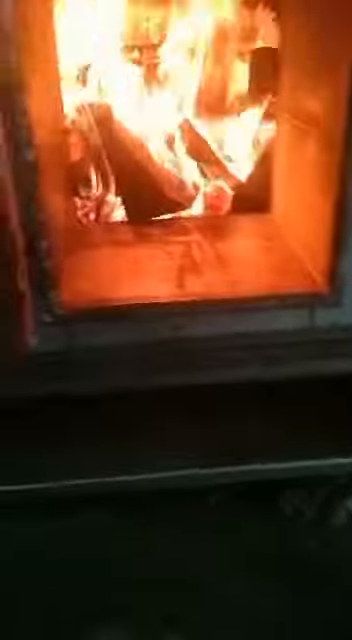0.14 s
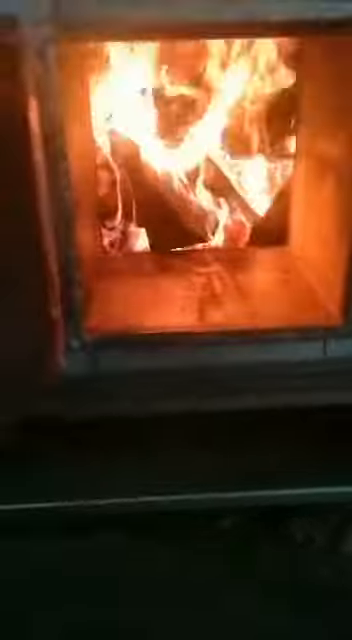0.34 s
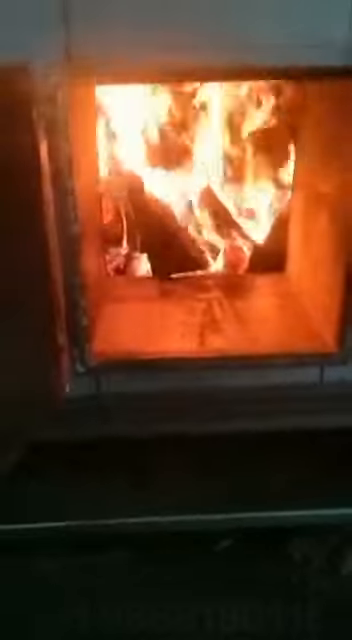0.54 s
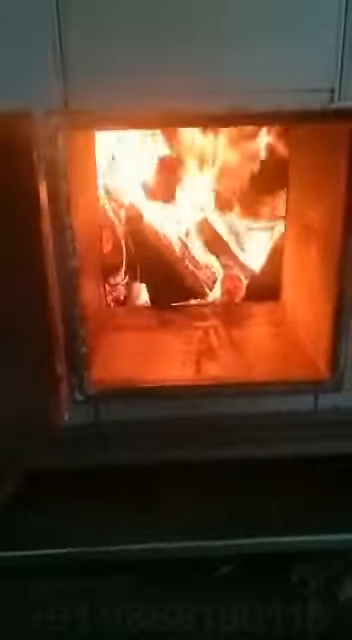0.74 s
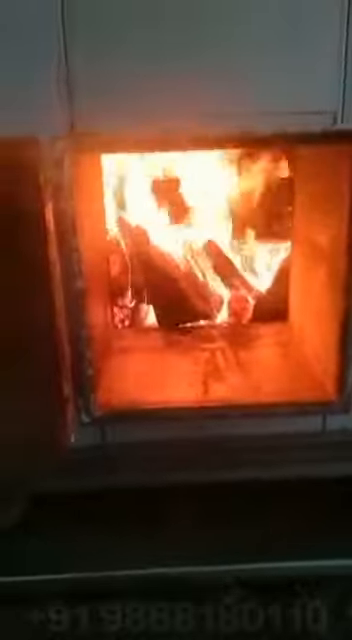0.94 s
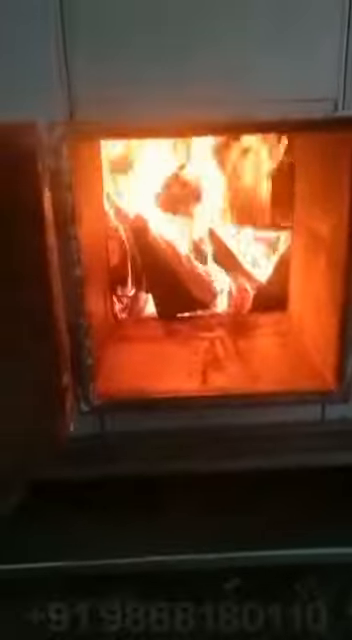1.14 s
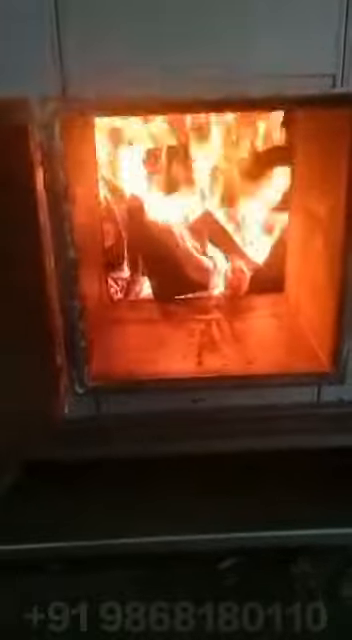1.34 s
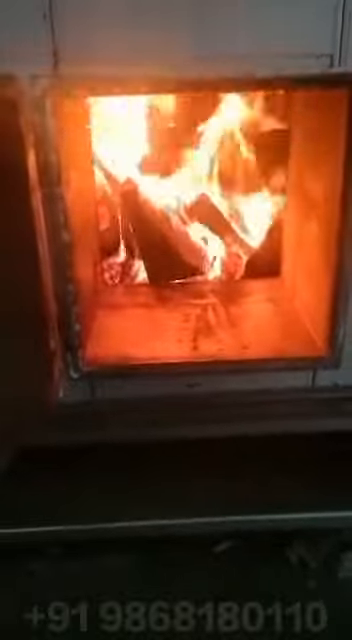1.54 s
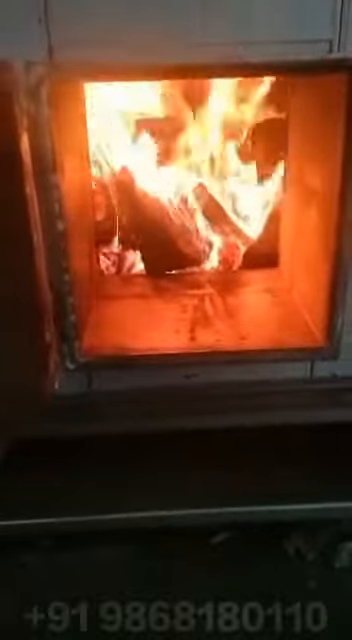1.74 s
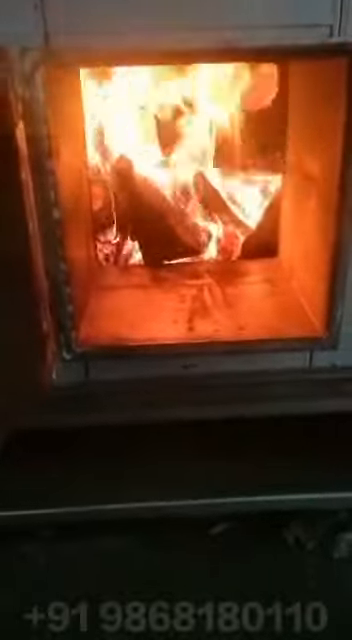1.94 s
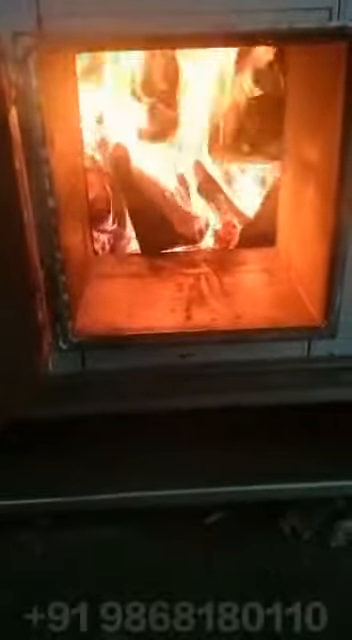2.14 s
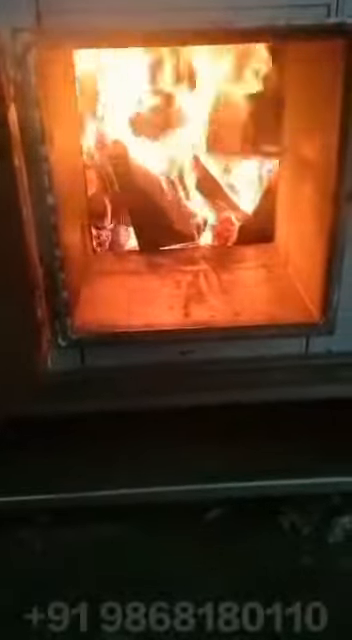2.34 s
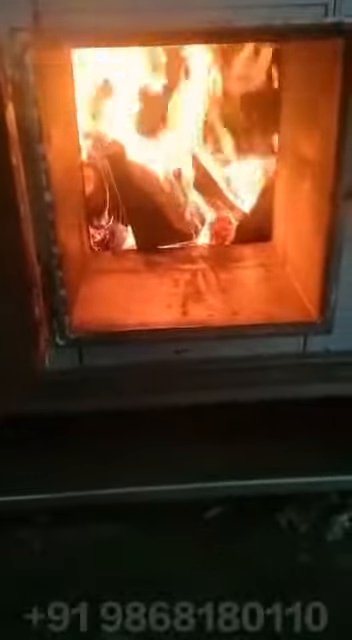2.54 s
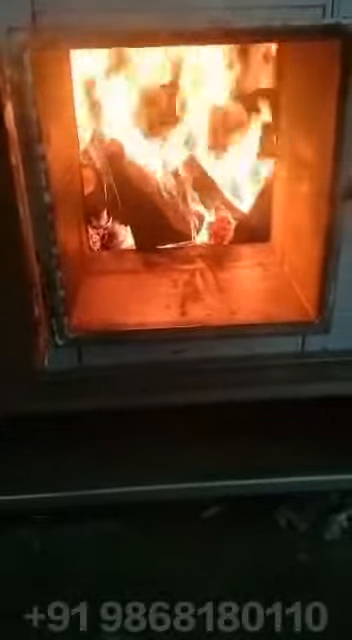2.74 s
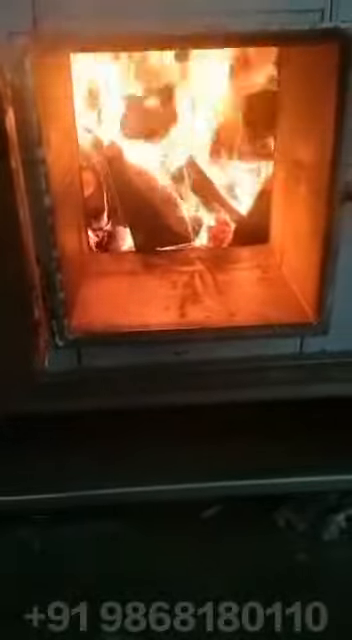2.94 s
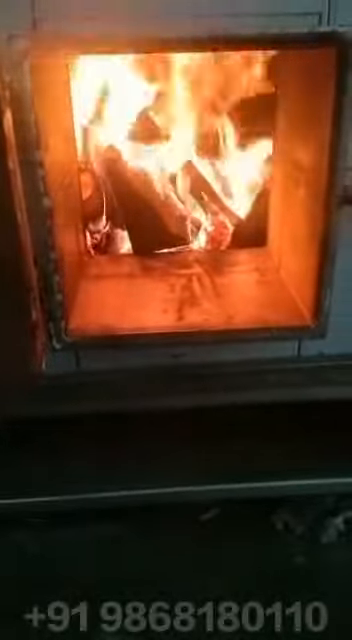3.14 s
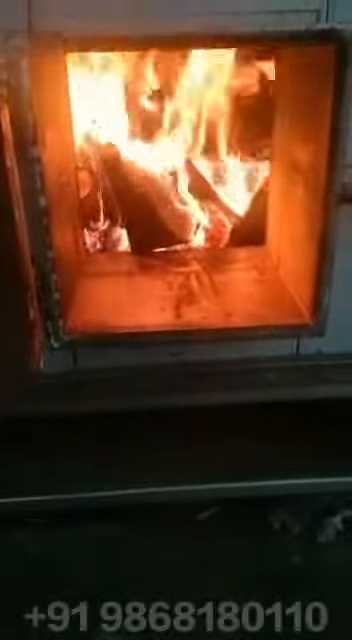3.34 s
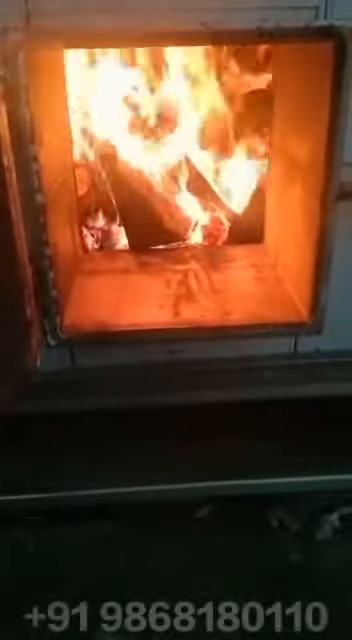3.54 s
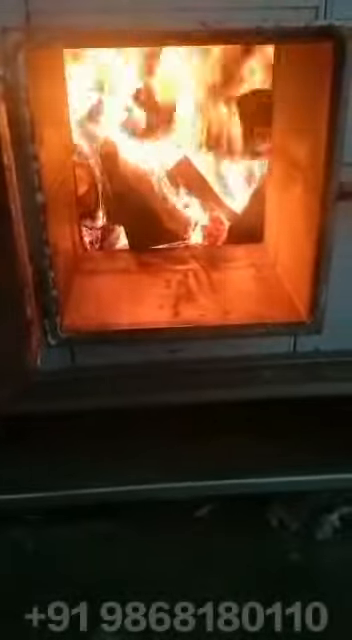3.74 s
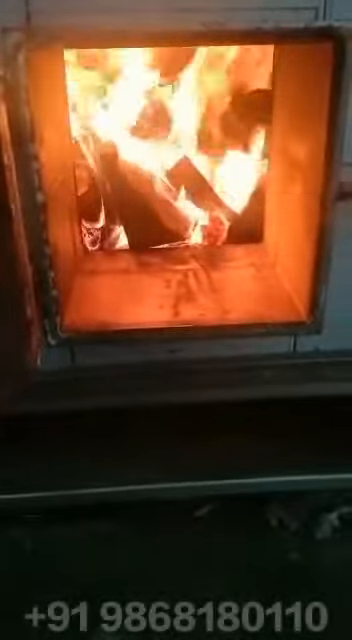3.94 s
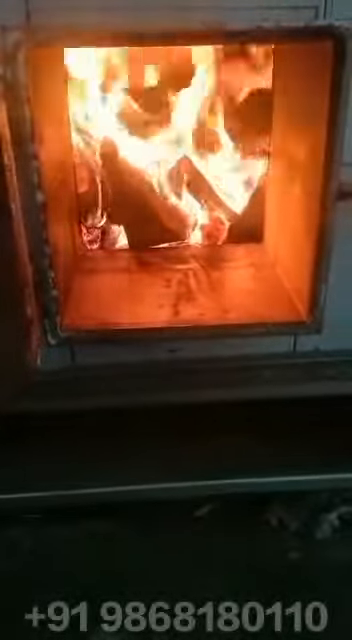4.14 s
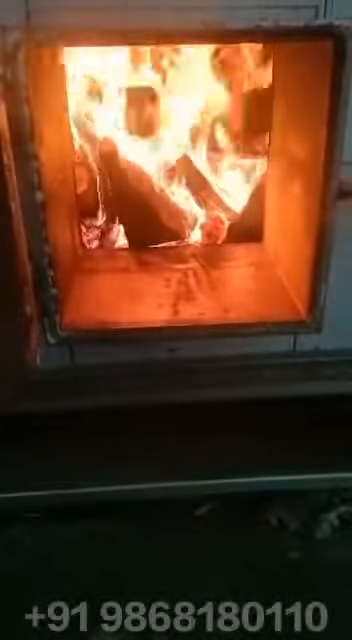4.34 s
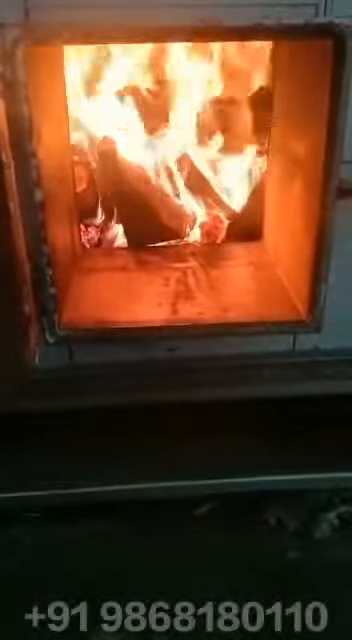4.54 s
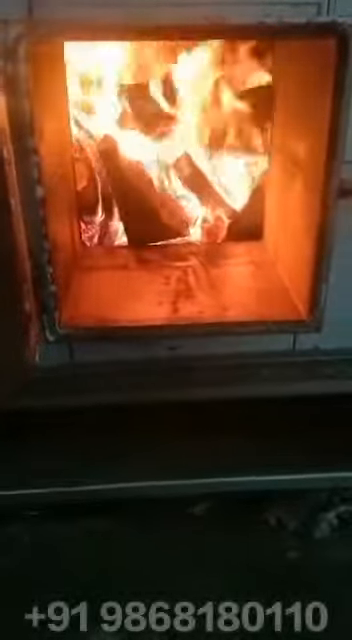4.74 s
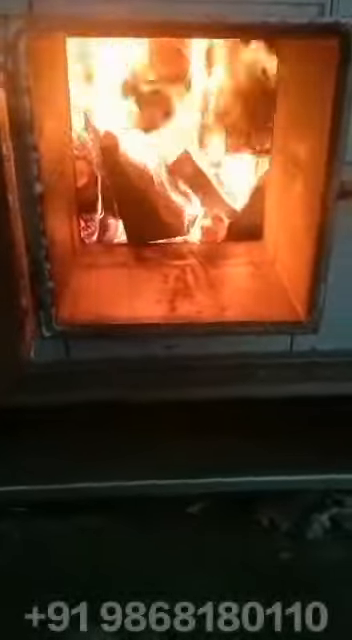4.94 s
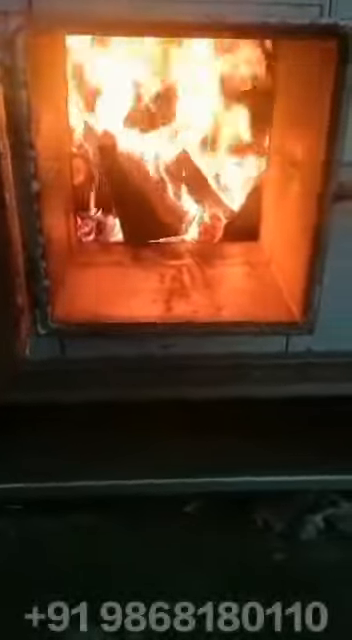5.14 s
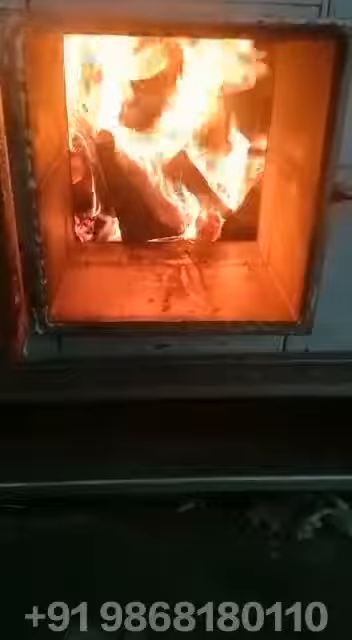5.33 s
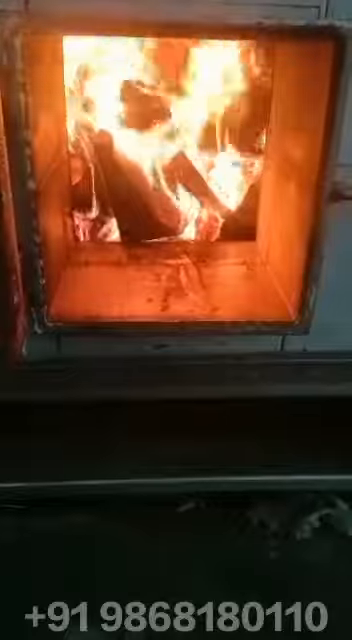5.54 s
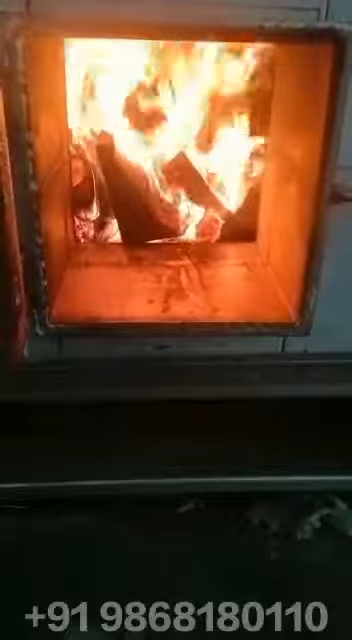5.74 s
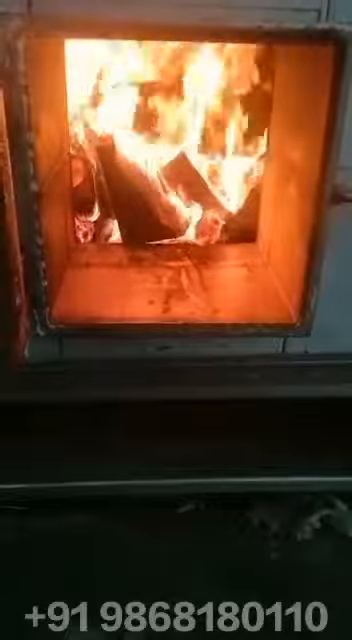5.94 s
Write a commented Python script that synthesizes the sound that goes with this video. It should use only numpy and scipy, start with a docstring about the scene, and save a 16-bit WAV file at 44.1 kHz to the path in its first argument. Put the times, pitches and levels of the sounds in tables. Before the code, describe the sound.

After a brief silence, a close log fire roars steadily in a furnace firebox with bright rushing hiss, flares and late fluttering puffs.

```python
"""After a short silence the steady roar and bright hiss of a hard-burning log fire cut in, close by.
Burning gas in the furnace firebox and its tongues of flame are banded noise that swells in flares and
lulls; pockets of gas puff in short noise bursts over a deep rumble. Draught through the grate is shaded
noise, and narrow resonances and brief notes sing in it. Hard walls colour the noise with drifting peaks,
different at each microphone."""
import sys
import numpy as np
from scipy import signal
from scipy.fft import rfft, irfft, next_fast_len
from scipy.io import wavfile
from scipy.ndimage import uniform_filter1d, map_coordinates

SR = 44100
rng = np.random.default_rng(int(sys.argv[2]) if len(sys.argv) > 2 else 0)


def digitize_waveform(pressure):
    """Quantize a signal to 16-bit integers and store it at the path in sys.argv[1].

    Rows of a 2-D input are taken as channels; values are limited to [-1, 1].
    """
    field = np.atleast_2d(pressure).T
    bounded = np.clip(field, -1, 1)
    quanta = np.round(bounded * 32767).astype(np.int16)
    wavfile.write(sys.argv[1], SR, quanta)


N = 263277
TIME = np.arange(N) / SR  # s

# left-right correlation of the fire's noise: f/Hz, correlation [-1 to 1]
FIRE_CORRELATION = [(60, 1), (250, 0.94), (450, 0.69), (800, 0.22), (1050, -0.1), (1600, -0.077),
                    (3000, 0.21)]
# treble shading of the hiss: t/s, level/dB contributed at 6 kHz
HISS_TREBLE = [(.27, -0.5), (.6, 1.5), (1.24, .5), (1.4, -2), (1.52, -5), (1.66, -8.5), (1.79, -14.5),
               (1.88, -2), (1.97, -2.5), (2.07, 2.5), (2.7, 1), (3.05, -2), (3.25, 1), (3.55, -2), (3.8, 2),
               (4.22, -2), (4.45, 1), (5.15, -1.5), (5.27, 1), (5.38, -7), (5.47, -2), (5.56, 0.5),
               (5.85, -1.5), (5.96, 1.5)]


def flames():
    """Combustion noise: burning gas roars low, and tongues of flame flutter above as they tear off."""
    # spectral density of the low roar: f/Hz, relative level/dB per Hz
    roar_spectrum = [(20, -51), (40, -28), (60, -23), (100, -10), (150, -7.5), (210, -0.5), (260, -2),
                     (310, 3), (370, 1), (450, -2), (700, -15), (1500, -31), (4000, -63.5)]
    # spectral density of the tongues of flame: f/Hz, relative level/dB per Hz
    tongue_spectrum = [(150, -32), (350, -6.5), (480, -3.5), (600, 0), (700, 1.5), (1000, 2.5), (1250, 1.5),
                       (1450, 1), (1700, -3.5), (2000, -7), (3500, -13), (7000, -53.5)]
    roar_base_db, tongue_base_db = -29.5, -20
    growth_db_per_s = 0.07
    tongue_share = 0.55  # of a flare's dB

    flare = flare_db()
    flicker_db = 0.67 * wobble(3.94) + 0.5 * wobble(12) + 0.5 * wobble(35)
    blaze_db = growth_db_per_s * TIME + flicker_db
    roar_db = roar_base_db + blaze_db + flare
    tongue_db = tongue_base_db + blaze_db + tongue_share * flare
    roar = turbulence(roar_spectrum, FIRE_CORRELATION, eddy_db=0.5, wall_db=3.0)
    tongues = turbulence(tongue_spectrum, FIRE_CORRELATION, eddy_db=0.15, wall_db=2.0)
    return amp(roar_db) * pan(0.67) * roar + amp(tongue_db) * pan(0.7) * tongues


def flare_db():
    """Heat-release variation: each flare or lull moves linearly in dB to its peak and back."""
    # flares and lulls: peak t/s, rise time/s, fall time/s, level/dB relative to the steady blaze
    flares = [(1.65, 0.42, 0.28, 3.6), (1.95, 0.24, 0.18, 4), (2.33, 0.12, 0.12, -1.5),
              (2.919, 0.25, 0.45, 2), (4.181, 0.074, 0.13, 2), (4.75, 0.4, .6, -1.5), (5.25, .03, 0.3, 0.5)]
    total_db = np.zeros(N)
    for peak_s, rise_s, fall_s, level_db in flares:
        rising = 1 + (TIME - peak_s) / rise_s
        falling = 1 - (TIME - peak_s) / fall_s
        total_db += level_db * np.clip(np.minimum(rising, falling), 0, 1)
    return total_db


def puffs():
    """Transient combustion: each gas pocket ignites with a dull thump and a brighter flap of flame."""
    # gas pockets: t/s, thump level/dB and flap level/dB before the burst envelope, decay constant/s
    pockets = [(1.735, -20, -32.5, .06), (1.885, -18.5, -21.5, 0.057), (2.04, -16, -27, .02),
               (5.216, -17, -15, 0.02), (5.237, -13, -7.5, .013), (5.263, -14, -6.5, .013),
               (5.283, -22, -9.5, 0.014), (5.34, -25, -18, 0.025), (5.378, -18, -17, 0.02),
               (5.422, -26, -9.5, .026), (5.47, -15.5, -14.5, .026), (5.54, -20, -15, 0.016)]
    # spectral density of the thump: f/Hz, relative level/dB per Hz
    thump_spectrum = [(25, -21.5), (70, -18), (120, -6.5), (260, 3), (450, -8), (900, -24)]
    # spectral density of the flap: f/Hz, relative level/dB per Hz
    flap_spectrum = [(250, -20.5), (480, -2.5), (750, -2.5), (1250, -0.5), (1800, -20.5), (4000, -26)]
    attack_s = 0.005

    thump_gain, flap_gain = np.zeros((2, N))
    for start_s, thump_db, flap_db, decay_s in pockets:
        age = np.maximum(TIME - start_s, 0)
        burst = (1 - np.exp(-age / attack_s)) * np.exp(-age / decay_s)
        thump_gain += amp(thump_db) * burst
        flap_gain += amp(flap_db) * burst
    thump = turbulence(thump_spectrum, FIRE_CORRELATION, eddy_db=0.5, wall_db=0.0)
    flap = turbulence(flap_spectrum, FIRE_CORRELATION, eddy_db=1.0, wall_db=5.0)
    return thump_gain * thump + flap_gain * flap


def draught():
    """Turbulent flow noise: air rushes through the grate in a hiss whose colour changes."""
    # spectral density of the rush, before shading: f/Hz, relative level/dB per Hz
    rush_spectrum = [(600, -31.5), (1700, -6.5), (2000, -10), (2350, -2.5), (2680, -7.5), (2850, -2.5),
                     (3700, -0.1), (4300, -2), (4650, -4.5), (5250, -6), (5650, -2), (6200, -6.5),
                     (6500, -16), (7400, -28.5)]
    # left-right correlation of the rush: f/Hz, correlation [-1 to 1]
    rush_correlation = [(500, 0.89), (1050, -0.33), (1700, -0.49), (2400, 0.12), (3400, -0.28),
                        (4050, 0.031), (4800, -0.13), (6100, 0.05)]
    base_db = -15.5
    tilt = 0.03  # dB gained by the whole rush per dB of treble shading lost

    treble_db = np.interp(TIME, *np.transpose(HISS_TREBLE))
    air = shaded(turbulence(rush_spectrum, rush_correlation, eddy_db=1.1, wall_db=3.5))
    level_db = base_db - tilt * treble_db + 0.29 * wobble(7.8)
    return amp(level_db) * pan(1.9) * air


def shade_db(hz, s):
    """Spectral shading: level changes of the treble, upper middle and middle add up in dB."""
    # upper-middle shading: t/s, level/dB contributed at 3.75 kHz
    upper_level = [(1.1, -.3), (1.35, -1.2), (1.55, -2.8), (1.77, -5), (1.9, -3.2), (2, -.5), (2.8, .3),
                   (5.26, 0.5), (5.33, -2), (5.45, 0)]
    # middle shading: t/s, level/dB contributed at 2.4 kHz
    middle_level = [(.27, -1.5), (1.25, 2), (1.8, -0.5), (2.15, 2), (2.7, -0.5), (3.7, 1), (5.15, 1.5),
                    (5.21, 5), (5.26, -0.5), (5.45, -2), (5.56, 0.5)]
    treble_share = np.minimum((hz / 6000) ** 3.9, 1.1)
    upper_share = np.exp(-((hz - 3750) / 900) ** 2)
    middle_share = np.exp(-((hz - 2400) / 850) ** 2)
    treble_db = treble_share * np.interp(s, *np.transpose(HISS_TREBLE))
    upper_db = upper_share * np.interp(s, *np.transpose(upper_level))
    middle_db = middle_share * np.interp(s, *np.transpose(middle_level))
    return treble_db + upper_db + middle_db


def shaded(x):
    """Time-varying filtering: the hiss shading is applied to short-time spectra."""
    hz, s, z = signal.stft(x, SR, nperseg=512)
    return signal.istft(z * amp(shade_db(hz[:, None], s)), SR, nperseg=512)[1][:, :N]


def cavity():
    """Cavity resonance: flares swell the low modes and upset the high ones, which follow the hiss."""
    # modes of firebox and grate: f/Hz, width/Hz, rms level/dB before drive and common gain,
    # left-over-right level/dB
    modes = [(174, 20, -40.5, 0), (248, 16, -35, 1), (285, 75, -32.5, 0), (874, 22, -39, 3),
             (1014, 15, -33.5, 2), (1092, 14, -39, -1), (1326, 9, -35.5, 0), (1400, 30, -36, 2),
             (1744, 26, -40, 1), (2310, 60, -35, 1), (2418, 16, -35.5, 3), (2810, 30, -36, -2),
             (2890, 32, -32.5, -3), (2970, 30, -38, 0), (3385, 50, -35, 4), (3569, 26, -33, 4),
             (3728, 20, -37, 4), (3846, 26, -34, 2), (4070, 40, -33, 3), (4128, 32, -32.5, 4),
             (4270, 180, -31, 3), (4778, 20, -41, 2), (5044, 12, -39.5, 4), (5550, 70, -37, 3),
             (5720, 140, -32.5, 3)]
    flare_loss = 0.76  # dB a high mode loses per dB of flare
    common_gain_db = 1.16

    flare = flare_db()
    out = np.zeros((2, N))
    for hz, width_hz, level_db, side_db in modes:
        low = np.exp(-(hz / 600) ** 2)  # 1 for a low mode, 0 for a high one
        swell_db = 1.4 * (flare - 0.6) * low
        loss_db = flare_loss * np.maximum(flare, 0) * (1 - low)
        drive_db = swell_db - loss_db + shade_db(hz, TIME) + 1.5 * wobble(2.496)
        out += amp(level_db + drive_db) * pan(side_db) * resonance(hz, width_hz, FIRE_CORRELATION)
    return amp(common_gain_db) * out


def whistles():
    """Narrow-band modulation: fluttering notes swell, some glide, and sink; high ones are broader."""
    # notes: centre t/s, length/s, f/Hz at the centre, glide [share of f per s],
    # rms level/dB at full swell, left-over-right level/dB
    notes = [(0.33, 0.22, 2895, -0.02, -26.0, -4), (0.52, 0.3, 3730, 0.0, -27.5, 8),
             (0.55, 0.6, 2802, -0.01, -27.5, -4), (0.6, 0.8, 5535, 0.0, -29.5, 7),
             (0.65, 0.2, 1360, 0.0, -27.5, 7), (0.7, 0.45, 1325, 0.0, -26.5, 0), (0.7, 1, 1013, 0, -31, 6),
             (0.7, 1.1, 4135, 0.0, -26.0, 1), (0.75, 0.9, 1400, 0.0, -30.5, 4),
             (0.75, 1.1, 1090, 0.0, -27.5, -3), (0.9, 1.0, 2420, 0.0, -29.5, 1),
             (0.97, 0.25, 4200, 0.0, -26.5, 8), (1.65, 0.5, 2315, -0.02, -29.0, -3),
             (1.9, 0.25, 3175, -0.02, -27.5, 6), (1.95, 0.35, 872, 0.0, -28.5, 6),
             (1.98, 0.25, 1595, 0.0, -28.5, -1), (2.02, 0.2, 3585, 0.0, -26.0, 5),
             (2.17, 0.25, 2385, -0.08, -27.5, 3), (2.3, 0.45, 2925, -0.02, -28.0, -4),
             (2.35, 0.5, 962, -0.05, -27.0, 3), (2.35, 0.55, 2865, -0.04, -27.0, -6),
             (2.38, 0.5, 1025, -0.02, -24.5, 5), (2.5, 0.6, 5700, 0.0, -28.0, 4),
             (2.5, 0.8, 3848, 0.0, -29.0, 1), (2.7, 0.35, 2975, 0.0, -28.0, 0),
             (2.72, 0.2, 985, -0.12, -28.5, 0), (2.72, 0.3, 1808, -0.03, -30.0, 2),
             (3.15, 0.3, 4150, 0.0, -29.5, 5), (3.15, 0.45, 3485, -0.04, -27.5, 2),
             (3.15, 0.45, 3550, -0.035, -27.0, 4), (3.18, 0.6, 1030, -0.02, -24.0, 2),
             (3.2, 0.25, 5690, 0.0, -28.0, 0), (3.2, 0.65, 958, -0.05, -28.5, -1),
             (3.25, 0.75, 1742, -0.05, -30.0, 0), (3.28, 0.2, 3385, 0.0, -26.5, 5),
             (3.32, 0.35, 4085, -0.04, -25.5, 1), (3.4, 0.3, 1203, 0.0, -30.5, -6),
             (3.6, 0.4, 3572, 0.0, -26.0, 7), (3.68, 0.3, 5635, 0.0, -30.0, 8),
             (3.9, 0.3, 1058, 0.0, -28.5, 4), (4.3, 0.2, 4150, 0.0, -28.5, 8),
             (4.4, 1.4, 4855, 0.0, -31.5, 3), (4.53, 0.2, 4055, 0.0, -27.0, 8),
             (4.55, 0.55, 1400, 0.0, -29.0, -2), (4.8, 0.9, 1038, 0.02, -28.0, 3),
             (4.95, 0.3, 4125, 0.0, -28.5, 8), (5.55, 0.2, 5510, 0.0, -27.5, 3),
             (5.62, 0.3, 5775, 0.0, -28.5, 0), (5.7, 0.35, 1098, 0.0, -30.0, 2),
             (5.7, 0.5, 2868, 0.0, -28.0, -5), (5.72, 0.35, 2418, 0.0, -28.5, 8),
             (5.78, 0.35, 1030, 0.0, -29.0, -2), (5.88, 0.25, 4055, 0.0, -27.0, 8),
             (5.92, 0.25, 1400, 0.0, -29.5, 8)]
    # left-right correlation of the notes: f/Hz, correlation [-1 to 1]
    note_correlation = [(870, 0), (960, -.35), (1030, -.6), (1350, -.5), (1750, .1), (2900, .1), (3500, 0),
                        (4100, .3), (5700, .1)]

    out = np.zeros((2, N))
    for centre_s, length_s, hz, glide, level_db, side_db in notes:
        near = np.abs(TIME - centre_s) < length_s
        age = TIME[near] - centre_s
        swell = np.exp(-(2 * age / length_s) ** 4)
        tone = np.exp(2j * np.pi * hz * (age + glide * age ** 2 / 2))
        # random complex knots modulate amplitude and phase; their rate sets the bandwidth
        knots_per_s = 20 + 0.001 * hz
        position = (age + length_s) * knots_per_s
        flutter = rng.standard_normal((2, 256)) + 1j * rng.standard_normal((2, 256))
        parts = []
        for knots in flutter:
            modulation = np.interp(position, np.arange(len(knots)), knots)
            parts.append(unit(swell * np.real(tone * modulation)))
        angle = stereo_angle(note_correlation, hz)
        pair = mid_side(np.cos(angle) * parts[0], np.sin(angle) * parts[1])
        out[:, near] += amp(level_db) * pan(side_db) * pair * np.sqrt(np.mean(swell ** 2))
    return out


def rumble():
    """Low-frequency noise: a deep rumble independent of the flares builds late and holds."""
    # spectral density of the rumble: f/Hz, relative level/dB per Hz
    rumble_spectrum = [(25, -32.5), (70, -7), (110, 3), (200, -6.5), (500, -51)]
    base_db, gain_db = -42.5, 8
    start_s, rise_s = 4.9, 0.45
    swell = np.clip((TIME - start_s) / rise_s, 0, 1)
    noise = turbulence(rumble_spectrum, FIRE_CORRELATION, eddy_db=1.0, wall_db=-0.5)
    return amp(base_db + gain_db * swell) * noise


def turbulence(spectrum, correlation, eddy_db, wall_db):
    """Turbulence noise of rms 1: brief broad eddies and narrow drifting peaks of wall reflections."""
    pair = patchy(rng.standard_normal((2, N)), eddy_db, size=512, size_hz=9, size_time=8)
    pair = patchy(pair, wall_db, size=2048, size_hz=2, size_time=24)

    def response(hz):
        angle = stereo_angle(correlation, hz)
        return amp(along(spectrum, hz)) * [np.cos(angle), np.sin(angle)]

    mid, side = filtered(pair, response)
    return unit(mid_side(mid, side))


def patchy(x, depth_db, size, size_hz, size_time):
    """Random spectral modulation: a gain field smoothed over size_hz bins and size_time frames."""
    z = signal.stft(x, nperseg=size)[2]
    field = uniform_filter1d(rng.standard_normal(z.shape), size_hz, axis=-2)
    field = uniform_filter1d(field, size_time, axis=-1)
    return signal.istft(z * amp(depth_db * unit(field)), nperseg=size)[1][:, :N]


def resonance(centre_hz, width_hz, correlation):
    """Resonant filtering: stereo noise of rms 1 under one narrow peak."""
    m = next_fast_len(N, True)
    bins = m // 4  # the spectrum up to a quarter of the sampling rate
    hz = np.fft.rfftfreq(m, 1 / SR)[:bins]
    phase = np.exp(2j * np.pi * rng.random((2, bins)))
    drive = rng.standard_normal((2, bins)) * phase
    offset_hz = hz - centre_hz
    near = np.abs(offset_hz) < 400
    shape = near / (1 + 2 * (offset_hz / (np.abs(width_hz) + 1)) ** 2)
    mid, side = irfft(drive * shape, m)[:, :N]
    angle = stereo_angle(correlation, centre_hz)
    return unit(mid_side(np.cos(angle) * mid, np.sin(angle) * side))


def stereo_angle(correlation, hz):
    """Stereo coherence: weights cos and sin of this angle on mid and side give the correlation."""
    return np.arccos(np.clip(along(correlation, hz), -1, 1)) / 2


def mid_side(mid, side):
    """Sum and difference: left and right from mid and side."""
    return np.array([mid + side, mid - side])


def amp(db):
    """Logarithmic level: decibels to amplitude gain."""
    return 10 ** (np.asarray(db) / 20)


def unit(x):
    """Normalisation: x scaled to rms 1."""
    return x / np.sqrt(np.mean(x ** 2) + 1e-20)


def pan(db):
    """Interchannel level difference: gains that put left db above right."""
    return amp([[db / 2], [-db / 2]])


def along(points, hz):
    """Logarithmic frequency scale: interpolates (f/Hz, value) points."""
    f, value = np.transpose(points)
    return np.interp(np.log(hz + 1), np.log(f + 1), value)


def wobble(rate):
    """Slow random fluctuation: a smooth curve with rate knots a second."""
    knots = rng.standard_normal(int(N * rate / SR) + 4)
    return map_coordinates(knots, [TIME * rate], order=2)


def filtered(x, response):
    """Linear filtering: the spectrum of x times a response of frequency."""
    m = next_fast_len(N + SR // 4, True)
    return irfft(rfft(x, m) * response(np.fft.rfftfreq(m, 1 / SR)), m)[..., :N]


def low_pass(x, edge_hz):
    """Band limitation: a very steep treble cut without phase shift."""
    return filtered(x, lambda hz: 1 / np.sqrt(1 + (hz / edge_hz) ** 160))


def gain_control(x, window_s, ratio):
    """Compression: gain falls as the running power rises above its median, and rises below it."""
    window = max(int(window_s * SR), 1)
    power = np.abs(uniform_filter1d(np.mean(x ** 2, axis=0), window)) + 1e-9
    return x * (power / np.median(power)) ** (-np.clip(ratio, 0, 1) / 2)


def scene():
    """Superposition: the pressures of fire and draught add."""
    return flames() + puffs() + draught() + cavity() + whistles() + rumble()


def record(dry):
    """Compression, saturation and aliasing: the recorder evens, rounds and band-limits the sound."""
    # spectral images about the sampling rate: f/Hz before mirroring, image level/dB relative to source
    image_level = [(1000, -48.5), (2400, -60), (4100, -44), (5700, -58.5)]
    start_s, fade_s = 0.2605, 0.001
    sampling_hz, top_hz, sheen_top_hz = 16000, 7350, 15400

    even = gain_control(dry, window_s=0.08, ratio=0.3)
    rounded = even / (1 + np.abs(even / 0.8) ** 8) ** (1 / 8)
    opened = np.clip((TIME - start_s) / fade_s, 0, 1)
    narrow = low_pass(rounded * opened, top_hz)
    # the low sampling rate mirrors the sound into a very faint sheen in the top treble
    leak = filtered(narrow, lambda hz: amp(along(image_level, hz)))
    sheen = 2 * np.cos(2 * np.pi * sampling_hz * TIME) * leak
    return low_pass(narrow + sheen, sheen_top_hz)


dry = scene()
out = record(dry)
digitize_waveform(out)
```